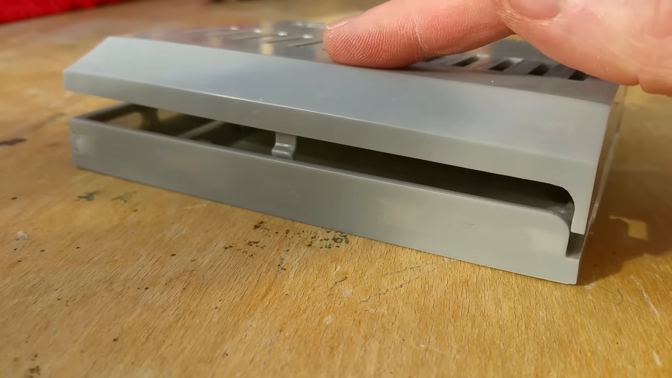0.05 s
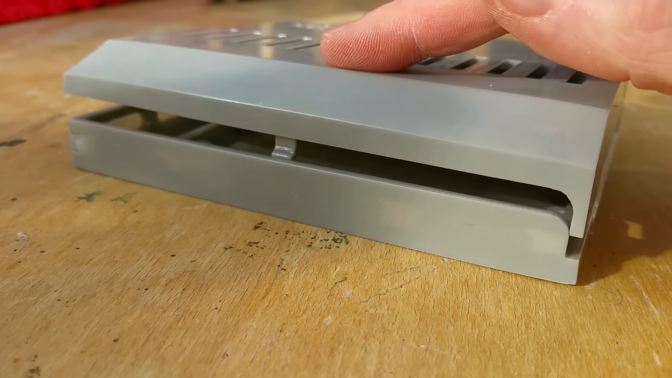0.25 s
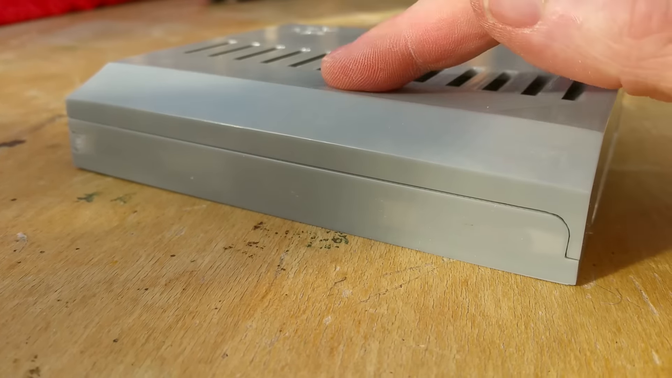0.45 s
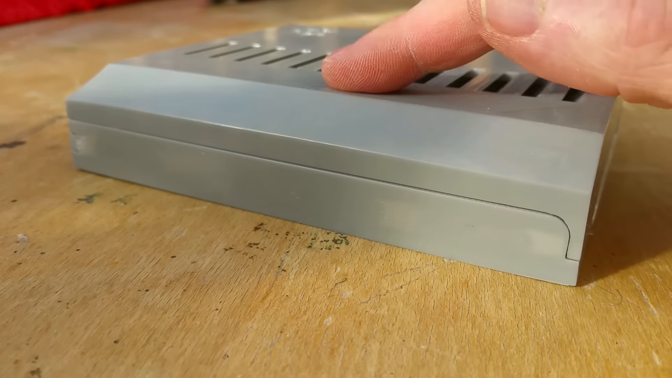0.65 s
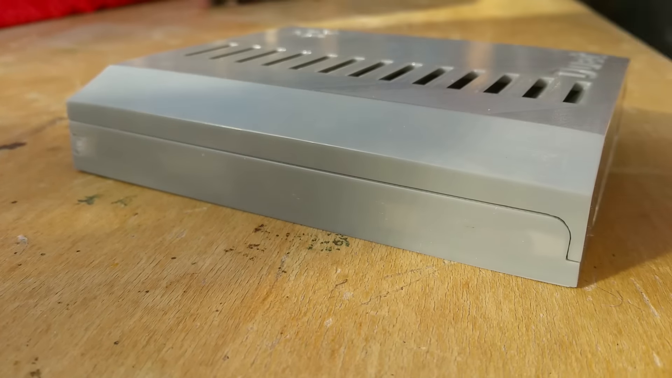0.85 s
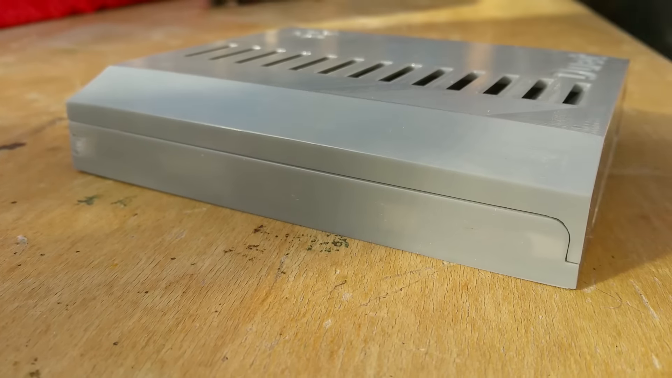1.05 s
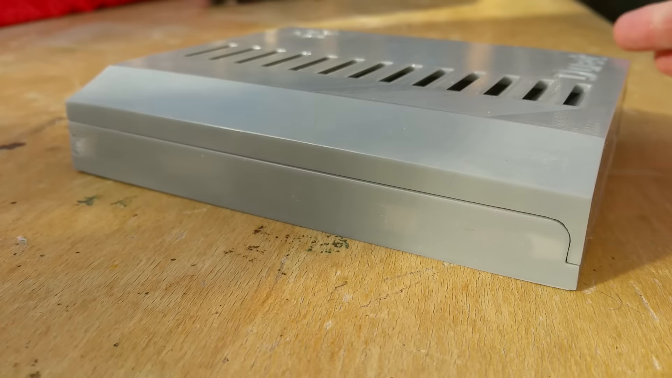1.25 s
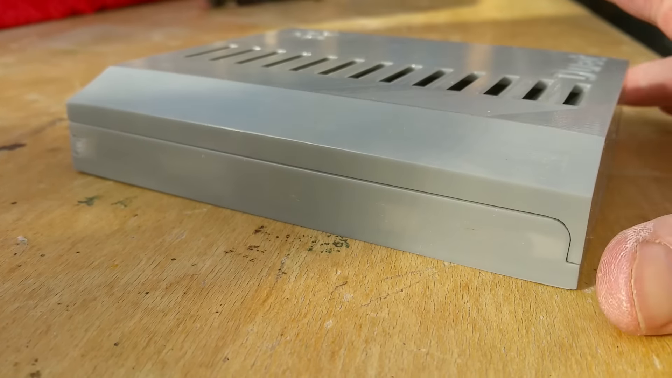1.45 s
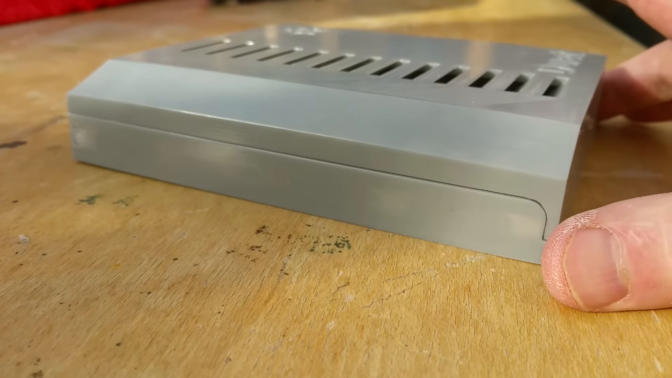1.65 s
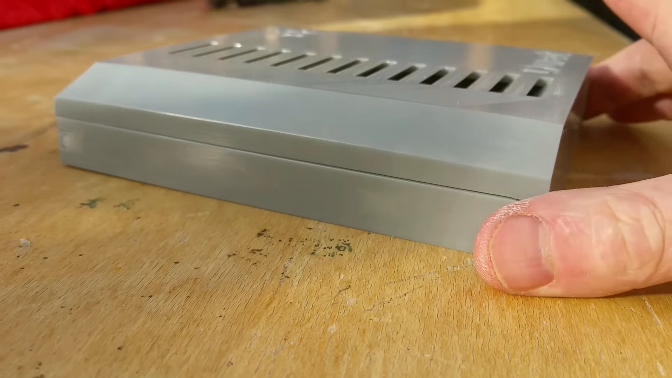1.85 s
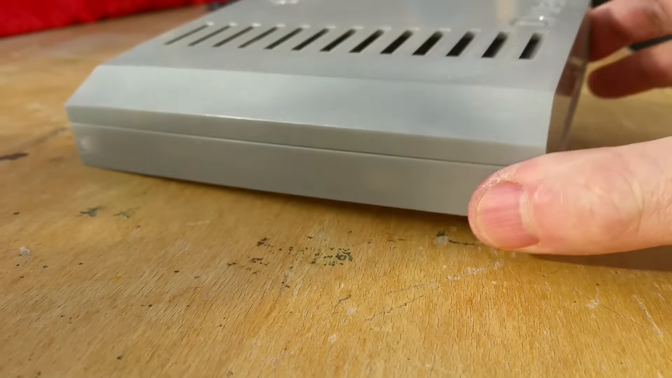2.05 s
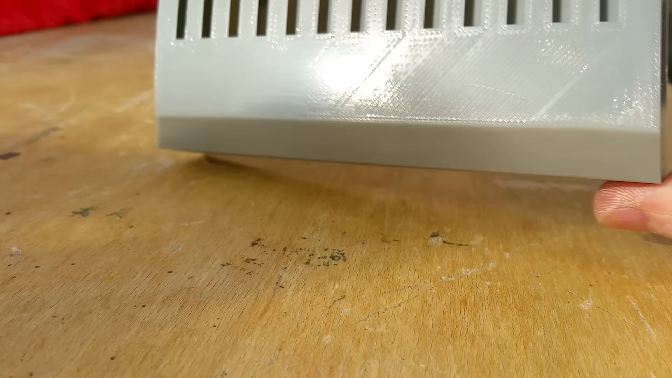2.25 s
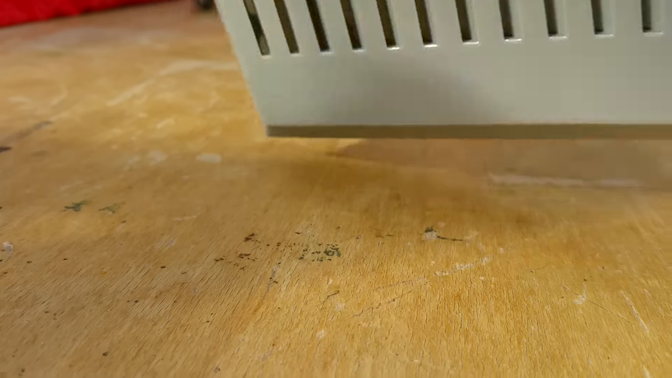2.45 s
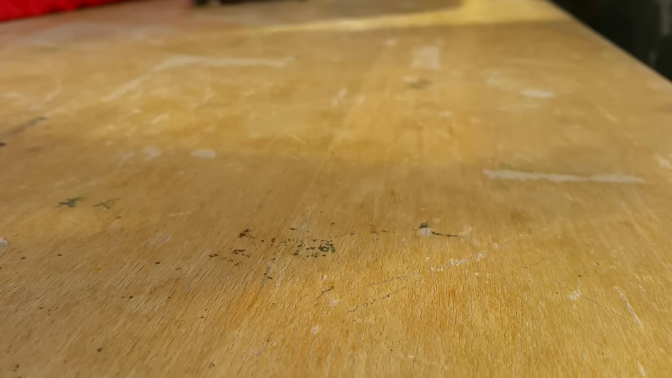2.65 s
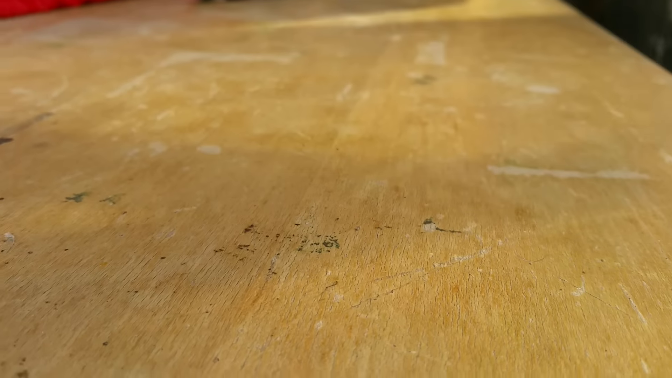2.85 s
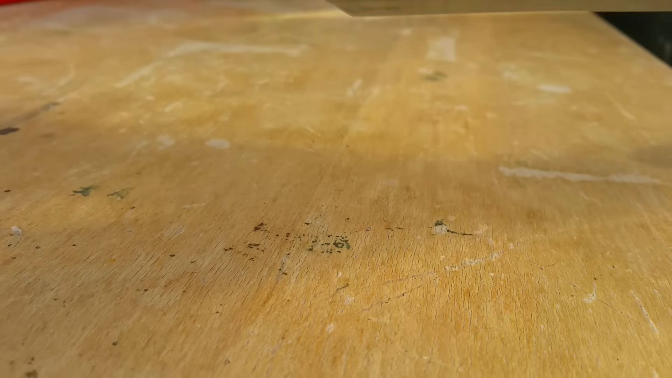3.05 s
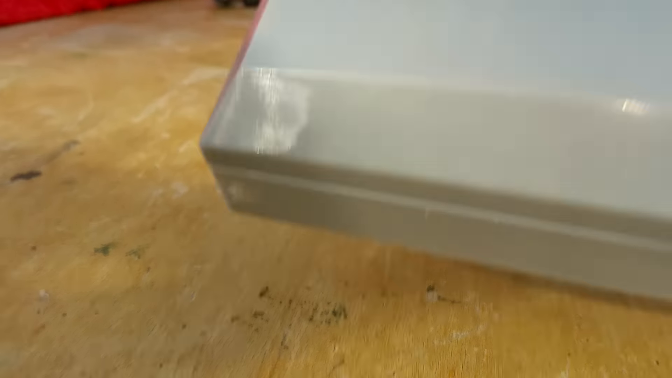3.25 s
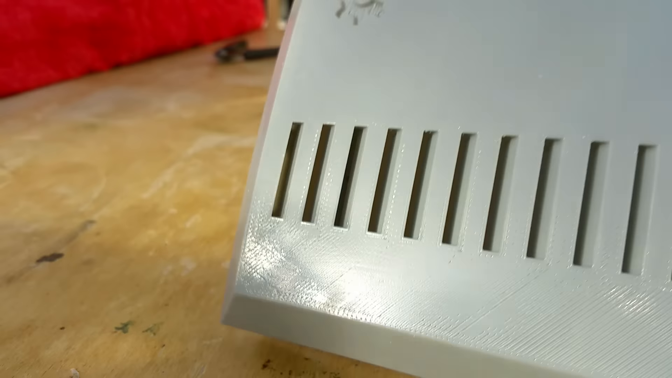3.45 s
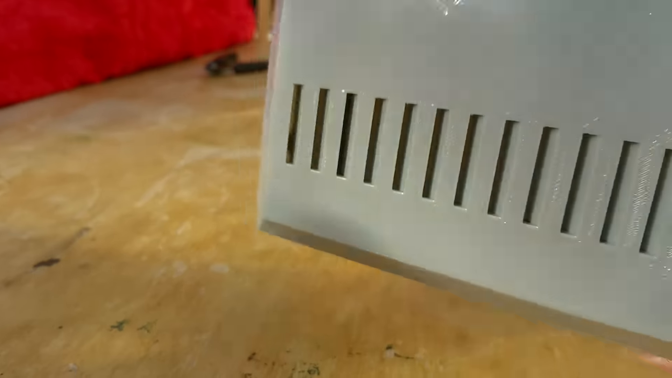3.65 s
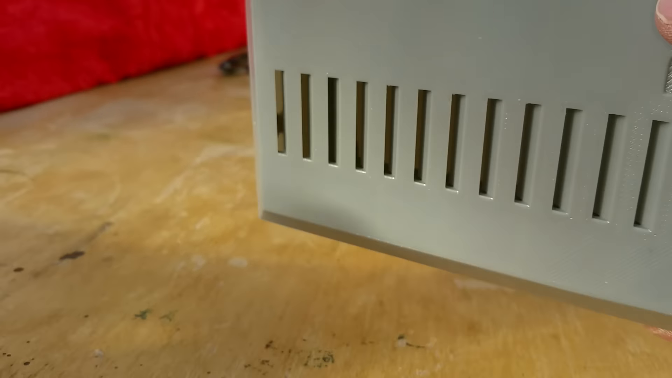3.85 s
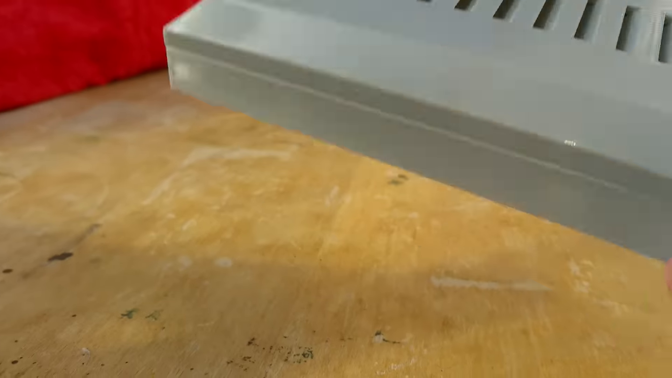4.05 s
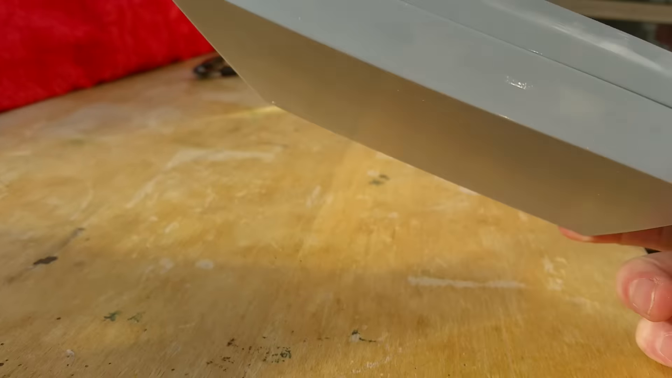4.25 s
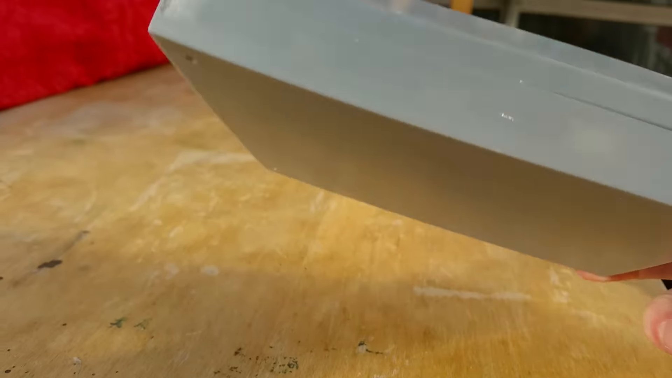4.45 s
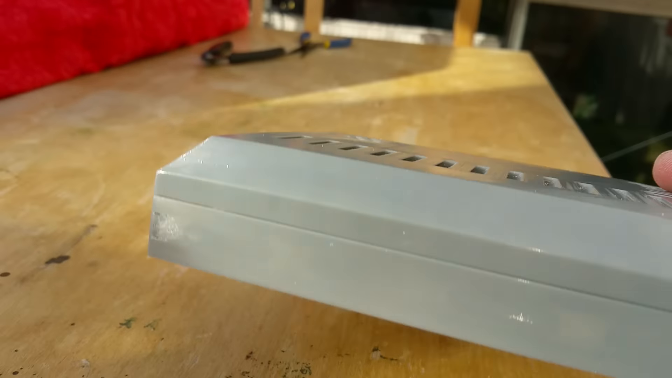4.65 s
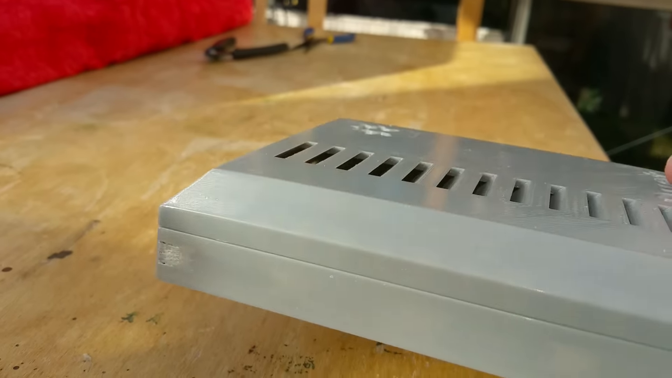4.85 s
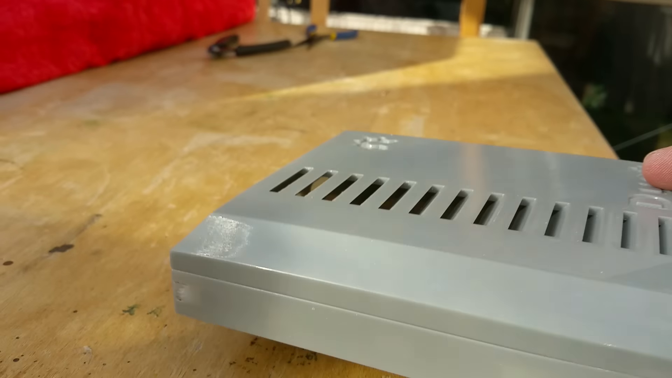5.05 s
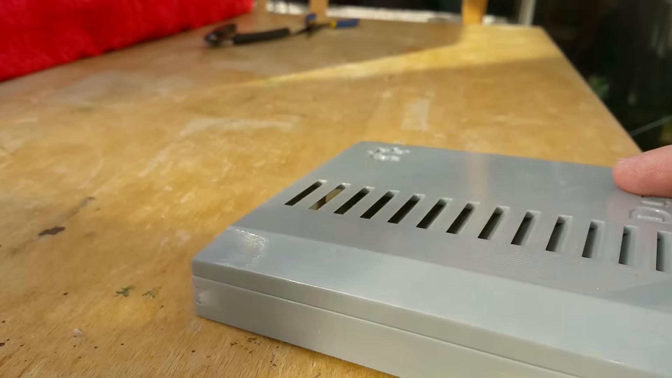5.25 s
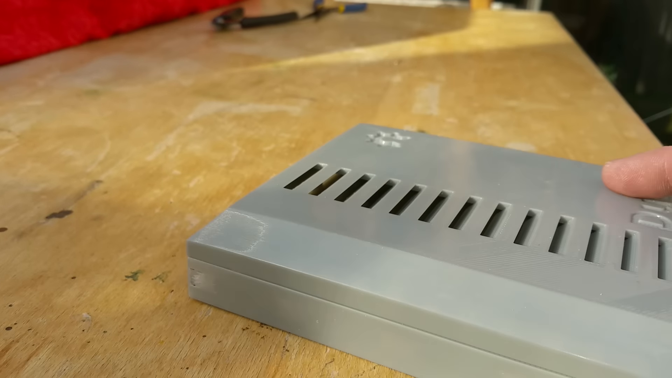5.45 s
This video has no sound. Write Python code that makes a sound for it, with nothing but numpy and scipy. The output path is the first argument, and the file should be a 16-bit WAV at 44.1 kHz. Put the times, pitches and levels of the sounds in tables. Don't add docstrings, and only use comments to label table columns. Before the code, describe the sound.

Close stereo microphone at a wooden bench, with far traffic and birds behind. A thin plastic case snaps shut in one very loud crack with quick rebounds; the background dips briefly. The case then scrapes and stutters hollowly over wood, is lifted with birds chirping, gets one light tap, and lands in a tight clatter followed by a single knock.

```python
import sys
import numpy as np
from scipy import signal
from scipy.fft import rfft, irfft
from scipy.io import wavfile
from scipy.ndimage import uniform_filter1d, map_coordinates

SR = 44100
rng = np.random.default_rng(int(sys.argv[2]) if len(sys.argv) > 2 else 0)


def materialize(psi):
    bounded = np.clip(np.atleast_2d(psi).T, -1, 1)
    quanta = np.round(bounded * 32767).astype(np.int16)
    wavfile.write(sys.argv[1], SR, quanta)


def gain_from_decibels(decibels):
    exponent = np.asarray(decibels, float) / 20
    return 10 ** exponent


N = 242550


def at_hz(points, hz):
    table_hz, values = np.transpose(points)
    return np.interp(np.log(hz), np.log(table_hz), values)


def rms_one(x):
    return x / np.sqrt(np.mean(x ** 2) + 1e-20)


def add(out, sound, start_s):
    i = round(start_s * SR)
    out[..., i:i + sound.shape[-1]] += sound[..., :N - i]


def drift(rate_hz):
    knots = rng.standard_normal(400)
    coarse = np.arange(0, N + 32, 32)
    curve = map_coordinates(knots, [coarse / SR * rate_hz], order=2, mode="wrap")
    return np.interp(np.arange(N), coarse, curve)


def swell(nearest_s, spread_s, extra_db):
    return extra_db * np.exp(-((np.arange(N) / SR - nearest_s) / spread_s) ** 2)


def resonance(x, hz, width_hz):
    r = np.exp(-np.pi * width_hz / SR)
    return signal.lfilter([(1 - r * r) / 2, 0, (r * r - 1) / 2], [1, -2 * r * np.cos(2 * np.pi * hz / SR), r * r], x)


def banded_noise(spectrum, size, gain=lambda hz: 1, step_octaves=0.55):
    # (frequency [Hz], correlation [-1..1])
    likeness = [(60, 0.93), (180, 0.98), (550, 0.24), (1650, -0.1), (4970, -0.031), (15000, -0.2)]
    out = 0
    edges_hz = 20 * 2 ** np.arange(0, 10.1, step_octaves)
    white = rng.standard_normal((2, 2, size))
    for k, (low_hz, high_hz) in enumerate(zip(edges_hz, edges_hz[1:])):
        hz = np.sqrt(low_hz * high_hz)
        if not spectrum[0][0] * .7 < hz < spectrum[-1][0] * 1.3:
            continue
        band = signal.butter(2, [low_hz, high_hz], "band", fs=SR, output="sos")
        mid, side = signal.sosfilt(band, white[k % 2])
        alike = np.clip(at_hz(likeness, hz), -1, 1)
        stereo = np.sqrt(1 + alike) * mid + np.sqrt(1 - alike) * side * [[1], [-1]]
        out = out + gain_from_decibels(at_hz(spectrum, hz)) * gain(hz) * stereo
    return rms_one(out)


def background():
    # (frequency [Hz], density [dB per Hz])
    air_spectrum = [(900, -24), (1500, -5), (2300, -10.5), (2900, -10.5), (5100, -18), (9000, -17.5),
                    (14000, -16.5), (18000, -18)]
    # (frequency [Hz], density [dB per Hz])
    traffic_spectrum = [(12, -44), (20, -11), (54, -10.5), (90, -5.5), (119, -8.5), (156, -4), (232, -7),
                        (264, -6), (293, -13), (445, -12), (636, -15.5), (1320, -27), (2330, -35.5),
                        (3000, -40.5), (3900, -70.5), (6600, -120)]
    # nearest [s], spread [s], extra level [dB]
    air_swell = (2.6, 0.93, 2)
    # nearest [s], spread [s], extra level [dB]
    traffic_swell = (3.05, 0.8, 3.7)
    # nearest [s], spread [s], extra level [dB]
    engine_swell = (2.47, 0.58, 15.8)
    # nearest [s], spread [s], extra level [dB]
    engine_lull = (1.9, .5, -11)
    air_db, traffic_db, drone_db, boom_db = -71, -56, -62, -64.5
    drone_hz = 88.4
    duck_db, duck_s, duck_fall_s = -11.5, .435, .04
    recover_s, recover_rise_s = 1.66, 0.22

    t = np.arange(N) / SR
    ducked = np.clip((t - duck_s) / duck_fall_s, 0, 1)
    recovered = np.clip((t - recover_s) / recover_rise_s, 0, 1)
    air = banded_noise(air_spectrum, N) * gain_from_decibels(air_db + swell(*air_swell))
    traffic = banded_noise(traffic_spectrum, N, lambda hz: gain_from_decibels(0.92 * drift(10.0)))
    traffic = traffic * gain_from_decibels(traffic_db + swell(*traffic_swell))
    engine_hz = drone_hz * (1 + 0.01 * drift(23.0))
    engine_db = drone_db + swell(*engine_swell) + swell(*engine_lull) + 1.1 * drift(13)
    drone = np.sin(2 * np.pi * np.cumsum(engine_hz) / SR) * gain_from_decibels(engine_db)
    boom = rms_one(resonance(rng.standard_normal(N), 295, 30)) * gain_from_decibels(boom_db)
    return (air + traffic + drone + boom) * gain_from_decibels(duck_db * (ducked - recovered))


def brushes():
    # (middle [s], length [s], level [dB], frequency [Hz])
    brush_table = [(.93, .07, -82, 4000), (1.225, 0.029, -79, 9040), (1.24, .04, -82, 3500),
                   (1.36, 0.054, -82.5, 4000), (1.48, .05, -82, 2930), (3.257, 0.17, -66.5, 2000),
                   (1.685, .035, -50, 190), (1.857, .03, -56, 230), (2.196, 0.036, -57, 172),
                   (3.248, .17, -73, 9500), (.427, .008, -59, 3003), (.426, .008, -46, 130),
                   (3.95, 0.16, -78, 2200), (5.029, .15, -77.5, 2395), (2.048, .035, -59, 3700),
                   (1.68, .02, -66, 3800), (1.66, .05, -56, 300), (1.79, .06, -60, 300),
                   (4.25, .15, -62, 140), (.28, .14, -70, 650), (2.555, .04, -62, 600),
                   (2.61, .03, -63, 620), (5.18, .04, -54, 90), (4.55, .12, -61, 160),
                   (3.25, .15, -68, 1000)]
    out = np.zeros((2, N))
    for middle_s, length_s, db, hz in brush_table:
        shape = np.hanning(int(length_s * 2 * SR))
        noise = resonance(rng.standard_normal((2, len(shape))), hz, hz * 0.26)
        add(out, rms_one(noise) * shape * gain_from_decibels(db), middle_s - length_s)
    return out


def birds():
    # (start [s], length [s], start pitch [Hz], held pitch [Hz], level [dB])
    song = [(1.41, 0.22, 7960, 7750, -91), (1.68, 0.074, 6400, 6370, -79.5), (1.74, 0.027, 6500, 6630, -73),
            (1.86, 0.078, 6600, 6360, -70), (1.905, 0.097, 6350, 5580, -70), (2.05, 0.14, 4420, 4430, -69),
            (2.125, 0.045, 4530, 5170, -67), (2.2, 0.15, 4320, 4560, -68), (2.29, 0.049, 4450, 5170, -66.5),
            (2.37, 0.13, 4400, 4520, -69), (2.455, 0.065, 4550, 5000, -72), (2.55, 0.029, 4720, 5220, -72),
            (2.565, 0.15, 6240, 6470, -71), (2.56, .025, 4900, 6300, -73), (2.725, .02, 4360, 6000, -72),
            (2.735, 0.066, 6090, 6370, -68), (2.78, 0.066, 6360, 6040, -66),
            (2.815, 0.049, 5760, 5550, -67), (2.03, 0.027, 5340, 4490, -62.5), (3.1, 0.04, 3595, 4454, -73),
            (5.075, 0.054, 4240, 4150, -79), (5.08, .04, 4650, 4600, -84.5)]
    # (start [s], length [s], start pitch [Hz], held pitch [Hz], level [dB])
    chirps = [(.38, .03, 2350, 2300, -78.5), (4.25, 0.036, 2050, 2200, -77), (5.1, .05, 2050, 2000, -75),
              (4.33, .05, 1500, 1400, -75), (0.72, 0.051, 2437, 2333, -88), (1, .038, 2360, 2350, -82),
              (3.41, 0.035, 3400, 3250, -81), (4.25, .04, 3250, 3150, -86), (4.365, 0.038, 3300, 3200, -76),
              (4.52, .03, 3300, 3000, -86), (5.1, 0.048, 2400, 2300, -74), (4.082, 0.031, 2343, 2500, -67),
              (4.222, 0.04, 2500, 2235, -66), (4.36, 0.06, 2480, 2370, -69),
              (4.502, 0.053, 2533, 2230, -66), (4.675, 0.019, 2290, 2260, -71)]
    song_glide_s, chirp_glide_s = .022, .025
    leap_hz = 600
    sag_db_per_s = 50
    out, waver = np.zeros(N), drift(420)
    for notes, glide_s in ((song, song_glide_s), (chirps, chirp_glide_s)):
        for s, length_s, start_hz, held_hz, db in notes:
            t = np.arange(0, length_s, 1 / SR)
            step_hz = start_hz - held_hz
            haste = max(abs(step_hz) / leap_hz, 1)
            pitch_hz = held_hz + step_hz * np.exp(-t / glide_s * haste)
            pitch_hz *= 1 + 0.014 * waver[round(s * SR):][:len(t)]
            level = gain_from_decibels(db - sag_db_per_s * (t - length_s / 2)) * signal.windows.tukey(len(t), .3)
            add(out, np.sqrt(2) * level * np.sin(2 * np.pi * np.cumsum(pitch_hz) / SR), s)
    echo_t60_s, echo_db = 0.26, -29
    echoes = rng.standard_normal((2, 12000)) * gain_from_decibels(-60 * np.arange(12000) / SR / echo_t60_s + echo_db)
    echoes[:, 0] = [.6, .5]
    return signal.fftconvolve(out[None], echoes, axes=1)[:, :N]


def reflections(colour):
    # (frequency [Hz], t60 [s])
    room_t60 = [(100, 0.41), (300, 0.32), (700, 0.19), (1200, 0.19), (2000, 0.21), (6000, 0.21),
                (14000, 0.22)]
    t = np.arange(16000) / SR
    tail = banded_noise(colour, len(t), lambda hz: gain_from_decibels(-60 * t / at_hz(room_t60, hz)), step_octaves=1 / 3)
    near_walls = 0.49 * np.clip((t - .002) / 0.0012, 0, 1)
    far_walls = 0.6 * np.clip((t - .016) / 0.013, 0, 1)
    return tail / 4 * (near_walls + far_walls)


def knocks(events, modes, colour, clack_t60_s, level_db, wet_db):
    contact_s = .0005
    apart_hz = 1500
    rung, clacked = np.zeros((2, N)), np.zeros((2, N))
    t = np.arange(6000) / SR
    hz, mode_db, t60_s = np.transpose(modes)[:, :, None]

    def clack_gain(f):
        return gain_from_decibels(-60 * t / (clack_t60_s * (f / 1000) ** -.45)) * (f / 1000) ** 0.9

    for s, db, bright_hz, clack_db, pan_db in events:
        strength = gain_from_decibels(mode_db + 0.91 * rng.standard_normal(hz.shape))
        strength = strength / (1 + (hz / bright_hz) ** 2) * rng.choice([-1, 1], hz.shape)
        phase = rng.standard_normal((2, len(hz), 1)) * np.minimum(hz / apart_hz, 1.5)
        decay = gain_from_decibels(-60 * t / np.clip(t60_s, .01, .1))
        rings = (strength * decay * np.sin(2 * np.pi * hz * t + phase)).sum(axis=1)
        body = resonance(rings * np.minimum(t / contact_s, 1), 1000, 5800)
        clack = banded_noise(colour, len(t), clack_gain, step_octaves=1 / 3)
        gain = gain_from_decibels(db + level_db) * gain_from_decibels([[pan_db / 2], [-pan_db / 2]])
        add(rung, gain * body / np.abs(body).max(), s)
        add(clacked, gain * gain_from_decibels(clack_db) * clack / np.abs(clack).max(), s)
    add(clacked, gain_from_decibels(wet_db) * reflections(colour), events[0][0])
    return np.array([rung, clacked])


def thump():
    start_s, length_s, level_db = .434, .006, -27
    out, size = np.zeros((2, N)), int(length_s * SR)
    push = np.hanning(size) * np.cos(np.arange(size) / size * np.pi * 1.1)
    add(out, gain_from_decibels([[level_db + 2.5], [level_db - 2.5]]) * push, start_s)
    return out


def room(x):
    # (frequency [Hz], level [dB])
    room_colour = [(60, -8.5), (200, 0.5), (700, -5), (2000, -1), (5000, 0), (9000, -2), (16000, -1.5)]
    tail = reflections(room_colour)
    tail = tail / np.sqrt((tail ** 2).sum(axis=1).mean())
    return signal.fftconvolve(x.mean(axis=0)[None], tail, axes=1)[:, :N]


def ticks():
    # (time [s], peak level [dB], frequency [Hz])
    tick_table = [(1.328, -67, 2600), (1.985, -51, 3800), (2.138, -44, 3500), (2.2245, -40, 2600),
                  (2.2255, -49, 3900), (2.2244, -44, 6000), (2.2244, -38, 12500), (2.243, -44, 4600),
                  (2.243, -46, 10000), (2.262, -45, 4800), (2.262, -46, 3200), (2.2606, -45, 8300),
                  (5.1387, -40, 3200)]
    out = np.zeros((2, N))
    for s, db, hz in tick_table:
        click = rng.standard_normal((2, 400)) * gain_from_decibels(-60 * np.arange(400) / SR / 0.0032)
        click = resonance(resonance(click, hz, hz * 0.25), hz, hz * 0.25)
        add(out, click / np.abs(click).max() * gain_from_decibels(db), s)
    return out


def evened(x, window_s):
    return x / np.sqrt(uniform_filter1d((x ** 2).mean(axis=0), int(window_s * SR)) + 1e-12)


def slides():
    # (start of hold [s], hold [s], body level [dB], edge rasp re body [dB], hiss level [dB])
    stroke_table = [(1.632, 0.013, -52, -3.5, -68.5), (1.64, .008, -43, -17, -80),
                    (1.65, 0.019, -40, -11.5, -82), (1.679, 0.0087, -45.5, -4, -83),
                    (1.714, 0.0069, -57.5, -20, -78), (1.744, 0.066, -76, -26, -80),
                    (1.815, 0.0034, -71, -10.5, -77), (1.842, 0.0044, -57, -3, -69),
                    (1.854, 0.0098, -49, -2.5, -70.5), (1.886, .004, -46.5, -12, -63),
                    (1.903, 0.0056, -48.5, -5.5, -65), (1.911, 0.028, -49, -18, -67),
                    (1.977, 0.026, -54.5, -6, -80.5), (2.021, 0.013, -50.5, -3.5, -77),
                    (2.039, 0.028, -43, -2, -78), (2.078, 0.011, -47.5, -4, -77),
                    (2.106, 0.02, -45.5, -14, -77), (2.128, 0.006, -36, -13, -72),
                    (2.139, 0.0064, -30.5, -16, -67), (2.155, 0.013, -33, -8, -68),
                    (2.172, .005, -34.5, -15, -76), (2.185, 0.0096, -28.5, -18, -76),
                    (2.201, 0.005, -31.5, -12.5, -78), (2.227, 0.0055, -45.5, -29, -82),
                    (2.244, 0.0047, -39, -16, -72), (2.26, 0.005, -36.5, -9, -60),
                    (2.27, 0.0046, -38, -15.5, -75), (2.562, .02, -73, -23, -87),
                    (2.615, 0.01, -62.5, -16, -85), (2.805, 0.027, -57.5, -9, -76),
                    (5.306, 0.045, -59.5, -3.5, -69), (5.373, 0.028, -50.5, -9.5, -70),
                    (5.436, .004, -48.5, 5, -61)]
    # (frequency [Hz], width [Hz], level [dB])
    hollow = [(391.6, 36, -6), (659, 76, 7), (1006, 91, 3), (1270, 210, -9.5), (1665, 75, 7),
              (2125, 79, -3.5), (2320, 84, -7.5), (2430, 46, -51), (3150, 510, -37), (4200, 180, -80)]
    # (time [s], upper walls [dB], broad scratch [dB], bench boom [dB])
    lean = [(1.62, 0, 0, 7), (1.655, 5.5, -14, -1), (1.69, -3, -10, 0), (1.85, 8, -13, 8),
            (1.9, -7, 14, -6.5), (2.045, 0, 18.5, -2), (2.09, 4, 8, 5), (2.141, 3, 7, 0),
            (2.17, -3, 0.3, 5), (2.19, 3, -16, -0.5), (2.25, -1.5, 8, 4), (2.8, 2, -3, -5),
            (5.35, -0.5, 13, 4)]
    rise_db_per_s, fall_db_per_s = 1198, 900
    bite_db_per_s = 52
    slips_per_s = 4000
    judder_db, judder_s = 1.32, 0.01

    power = np.zeros((3, N))
    for s, hold_s, body_db, rasp_db, hiss_db in stroke_table:
        t = np.arange(s - .2, s + hold_s + .2, 1 / SR)
        shape_db = -rise_db_per_s * np.maximum(s - t, 0) - fall_db_per_s * np.maximum(t - s - hold_s, 0)
        bite_db = -bite_db_per_s * np.clip(t - s - hold_s / 2, -.05, .05)
        edge_db = body_db + rasp_db + shape_db + bite_db
        add(power, gain_from_decibels([body_db + shape_db, edge_db, hiss_db + 0.5 * shape_db]) ** 2, t[0])
    body_level, rasp_level, hiss_level = np.sqrt(power)

    sizes = gain_from_decibels(2.9 * np.minimum(rng.exponential(1, N), 4)) * rng.choice([-1, 1], N)
    slips = sizes * (rng.random(N) < slips_per_s / SR)
    spread = slips + .5 * np.roll(slips, 9) * [[1], [-1]]
    bands = []
    for k, (hz, width_hz, db) in enumerate(hollow):
        bands.append(gain_from_decibels(db) * resonance(spread, hz, width_hz * 0.72) / np.sqrt(width_hz) * (-1) ** k)

    lean_s, *lean_columns = np.transpose(lean)
    upper_db, scratch_db, boom_db = (np.interp(np.arange(N) / SR, lean_s, column) for column in lean_columns)
    walls = gain_from_decibels(boom_db) * bands[0] + bands[1] + gain_from_decibels(upper_db) * (bands[2] + bands[3])
    body = evened(walls + gain_from_decibels(-42.5) * resonance(spread, 500, 570), 0.0052)
    scratch = gain_from_decibels(scratch_db - 49.0) * resonance(spread, 2800, 1200)
    rasp = evened(resonance(sum(bands[4:]) + scratch, 2390, 1730), 0.022)

    white = rng.standard_normal((2, N))
    judder_size = int(judder_s * SR)
    slow = uniform_filter1d(uniform_filter1d(white, judder_size), judder_size)
    judder = gain_from_decibels(judder_db * rms_one(slow))
    hiss = rms_one(resonance(white, 3300, 3700)) * gain_from_decibels(-2.0)
    return body * body_level * judder[0] + (rasp * rasp_level + hiss * hiss_level) * judder[1]


def tilted(x, points):
    top_hz = 15850
    hz = np.arange(N // 2 + 1) * SR / N + 1
    tilt_db = at_hz(points, hz) / 2
    return irfft(rfft(x) * gain_from_decibels([tilt_db, -tilt_db]) * (hz < top_hz), N)


def scene():
    # (time [s], peak level [dB], contact brightness [Hz], clack re peak [dB], L-R [dB])
    snap = [
        (.4334, -3.5, 5000, 0, 1.5),
        (.4349, 2.5, 6280, 2.5, 3.5),
        (.4415, -16, 5000, -2, -1.5),
        (.4565, -9.5, 5000, -2.5, -3),
        (.481, -22, 2000, -7, -0.2),
        (.492, -22.5, 1494, -10, 0.64),
    ]
    catches = [(1.617, -47, 2498, -8, 0.1), (1.656, -30, 1500, -18, .1), (1.836, -50, 2490, 3, 0.0037),
               (1.85, -35.5, 2505, -8, 0.097), (1.885, -33, 1500, -10, 0.014), (1.923, -38, 2000, -15, .1),
               (2.138, -23, 3000, -24, 0.1), (2.184, -20, 1520, -22, 0.1), (2.245, -24, 3500, -8.5, 0.0037),
               (2.262, -23.5, 2480, -18.5, 0.1), (2.815, -50, 2510, -9, 0.0088)]
    tap = [
        (3.5243, -16.5, 3000, -18.5, 0),
        (3.5278, -12.5, 1500, -8.5, 0),
    ]
    landing = [
        (5.1548, -2.5, 4140, -4, -2),
        (5.1562, -5, 3000, -5, -2),
        (5.1595, -9, 2500, -10.5, -1.5),
        (5.1712, -7.5, 2980, -8.5, -1),
        (5.181, -12.5, 2510, -19, -3),
    ]
    settling = [
        (5.432, -6.5, 2500, -7.5, -1),
    ]

    # (frequency [Hz], level [dB], t60 [s])
    shut = [(185, -5, 0.05), (392, -9.5, 0.045), (572, -10, 0.039), (691, -7, 0.1), (780, -5, .03),
            (855, -8, .04), (910, -5, .06), (936.5, -6, .06), (1054, -6, 0.035), (1335, -7, 0.05),
            (1640, -2, 0.035), (2150, -8, 0.037), (2632, -11, 0.04), (3250, 4.5, 0.014)]
    gripped = [(400, -3, 0.04), (570, 3, 0.035), (695, 3, .04), (980, 1, 0.05), (1055, 1, .035),
               (1400, -8, 0.018), (1710, -2, 0.019), (2120, -17, 0.013), (2320, -21, 0.01)]
    held = [(168, 5, 0.1), (403.5, 1.5, 0.082), (549, 3, 0.064), (670, 7, 0.057), (857, -28, 0.15),
            (1050, 2, 0.06), (1430, -6, 0.025), (1690, 3, 0.04), (1760, -21, 0.044), (2320, -18, 0.016),
            (3220, -36, .02)]
    resting = [(389, -4.5, 0.14), (533, -7.5, 0.14), (656, -1.5, 0.024), (830, -4.5, 0.11), (881, -5, 0.08),
               (977, -7, 0.08), (1055, -7.5, 0.094), (1310, -12.5, 0.064), (1640, -1, 0.025),
               (1791, -5, 0.06), (2300, -2.5, 0.011), (2600, -4, 0.013), (3250, -1, 0.012)]
    flat = [(178, -1, 0.02), (440, -3.5, 0.06), (550, -1, 0.039), (654, -2, 0.056), (885, 3, 0.05),
            (1135, -6, 0.035), (1340, -7, 0.053), (1599, -3, 0.028), (2330, -13.5, 0.03),
            (3340, -16, 0.0082)]

    # (frequency [Hz], density [dB per Hz])
    snap_clack = [(35, -58), (60, -31), (578, -18.5), (681, -1), (1190, -18.5), (1620, -10), (1770, -15),
                  (3000, -14.5), (4200, -23), (5800, -25.5), (15900, -40.5)]
    tap_clack = [(180, -40), (300, -10), (649, 3), (1070, 0), (1250, -16), (1700, -7.5), (2070, -44),
                 (14000, -71)]
    landing_clack = [(88, -49), (150, -23), (398, -25), (475, -14.5), (852, -3.5), (1170, -17.5),
                     (1830, -9), (2010, -22.5), (3340, -15), (4000, -24.5), (6000, -29.5), (15900, -52.5)]
    settling_clack = [(88, -53), (150, -6.5), (309, -11), (886, 1), (1140, -8), (1340, -23), (1470, -8),
                      (2180, -16.5), (3100, -21.5), (6000, -42), (15900, -67.5)]

    # (frequency [Hz], L-R [dB])
    knock_side = [(100, -0.5), (700, 0.5), (2400, 0), (4400, -2.5), (8000, -4), (15000, -9)]
    ring_room_db, rub_room_db = -14.5, -14

    contacts = knocks(snap, shut, snap_clack, 0.035, -4.5, -15.0)
    contacts += knocks(catches, gripped, tap_clack, 0.044, -1.3, -79)
    contacts += knocks(tap, held, tap_clack, 0.1, -0.55, -42.0)
    contacts += knocks(landing, resting, landing_clack, 0.021, -3.5, -16.5)
    contacts += knocks(settling, flat, settling_clack, 0.088, -1.04, -30.0)
    rung, clacked = contacts
    rubbing = brushes() + ticks() + slides()
    near = tilted(rung + clacked, knock_side) + rubbing + thump()
    wet = room(gain_from_decibels(ring_room_db) * rung + gain_from_decibels(rub_room_db) * rubbing)
    return background() + birds() + near + wet


def low_pass(x):
    return signal.sosfilt(signal.butter(12, 15790, fs=SR, output="sos"), x)


def record(dry):
    # (frequency [Hz], L-R [dB])
    left_right = [(100, 3), (1300, 2.5), (4400, 1.5), (15000, 2)]
    mix = np.clip(tilted(dry, left_right), -1, 1)
    return low_pass(mix)


dry = scene()
out = record(dry)
materialize(out)
```